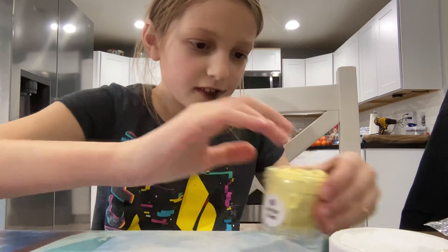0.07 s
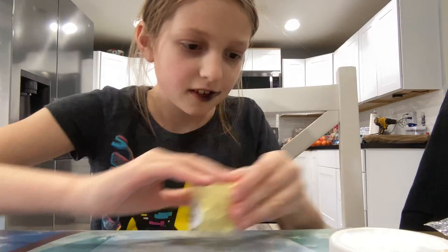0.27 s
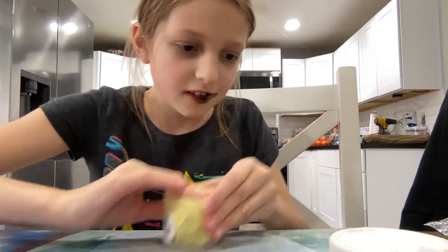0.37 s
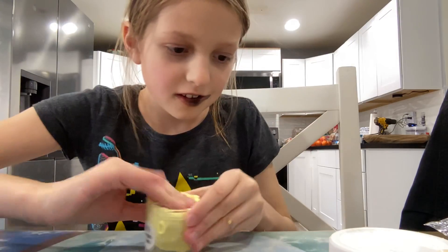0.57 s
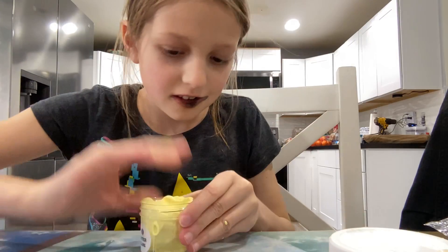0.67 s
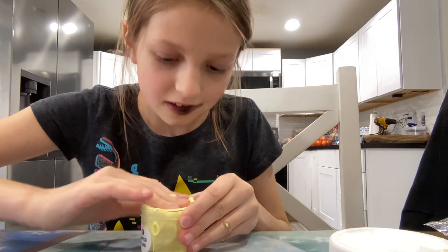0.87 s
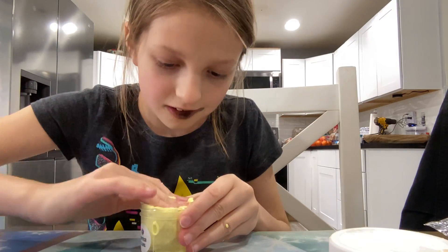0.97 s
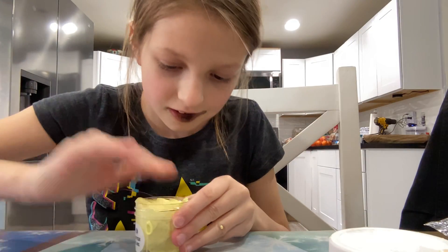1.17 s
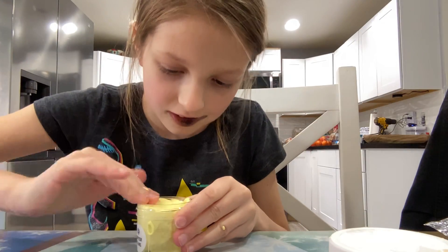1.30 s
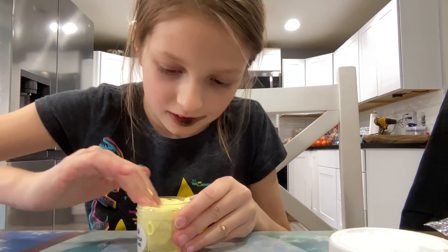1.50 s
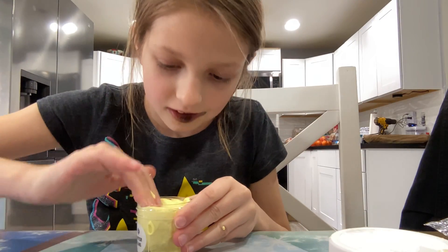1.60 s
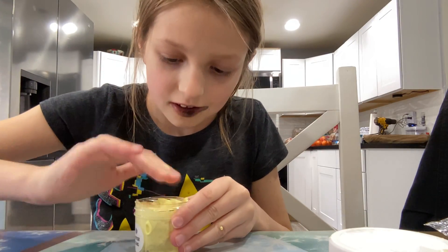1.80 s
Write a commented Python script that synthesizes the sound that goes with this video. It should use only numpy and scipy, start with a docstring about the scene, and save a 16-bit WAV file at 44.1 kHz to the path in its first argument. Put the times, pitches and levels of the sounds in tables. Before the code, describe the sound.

Sticky slime being pressed into a small plastic jar: sharp snaps, then the jar knocks down on a table with a thud and lid ticks, followed by softer wet rubbing and pushes, close microphone in a kitchen.

```python
"""Fingers press soft slime into a small plastic jar on a kitchen table, close to a phone, over steady room hum.
First faint sticky snaps and wet rubbing; louder snaps from 0.24 s; at 0.42 s the jar is set down,
the table top thuds, hands shift and a loose hard lid ticks. Then rubbing swells and fades between softer
snaps and pushes; the lid ticks twice more near 1.4 s; a last snap and a dull thud close.
Blows ring decaying modes; snaps are noise bursts with pocket notes; rubbing, hands and hum are shaped noise."""
import sys
import numpy as np
from scipy import signal
from scipy.fft import rfft, irfft
from scipy.io import wavfile
from scipy.ndimage import uniform_filter1d

SR = 44100
rng = np.random.default_rng(int(sys.argv[2]) if len(sys.argv) > 2 else 0)


def how_loud(loudness_db):
    """Turn decibels into a plain amplitude multiplier (0 dB gives 1, 20 dB gives 10)."""
    steps = np.asarray(loudness_db, float) / 20
    return 10 ** steps


def store_pcm(level_fs):
    """Save levels as 16-bit WAV."""
    pcm = np.round(np.clip(level_fs, -1, 1) * 32767).astype(np.int16)
    wavfile.write(sys.argv[1], SR, np.atleast_2d(pcm).T)


N = 81585  # samples


def colour(x, points):
    """Minimum-phase filter, via the cepstrum, with the given (Hz, dB) response."""
    point_hz, point_db = np.array(points, float).T
    hz = np.maximum(np.arange(2049) * SR / 4096, 1)
    log_gain = np.interp(np.log(hz), np.log(point_hz), point_db) * np.log(10) / 20
    cepstrum = irfft(log_gain)
    cepstrum[1:2048] *= 2  # fold onto positive time: causal
    cepstrum[2049:] = 0
    response = irfft(np.exp(rfft(cepstrum)))
    return signal.fftconvolve(x, response)[:len(x)]


def unit(x):
    """Scale to rms 1."""
    return x / np.sqrt(np.mean(x ** 2))


def decay(t, t60_s):
    """Exponential fall of 60 dB in t60_s."""
    return np.exp(-np.log(1000) * t / t60_s)


def seconds(length_s):
    """Time axis in seconds."""
    return np.arange(int(length_s * SR)) / SR


def ring(modes, scatter_db, length_s, sag=0):
    """Decaying modes of one blow, a row each, starting sharp by the fraction sag; and their time axis."""
    sag_s = 0.0097
    t = seconds(length_s)
    m = np.array(modes, float)
    hz, db, t60_s = m[:, :1], m[:, 1:2], m[:, 2:]
    gain = how_loud(db + scatter_db * rng.standard_normal((len(m), 1)))
    bent_t = t + sag * sag_s * (1 - np.exp(-t / sag_s))
    return gain * decay(t, t60_s) * np.sin(2 * np.pi * hz * bent_t), t


def add(out, x, at_s, peak_db):
    """Mix x in at a time with a peak level."""
    i = int(at_s * SR)
    out[i:i + len(x)] += (x * how_loud(peak_db) / np.abs(x).max())[:len(out) - i]


def walk(rate_hz):
    """Slow random wander, rms 1."""
    k = int(SR / rate_hz)
    steps = np.repeat(rng.standard_normal(N // k + 1), k)
    return unit(uniform_filter1d(uniform_filter1d(steps, k), k)[:N])


def follow(points):
    """Level in dB at every sample, straight lines between (s, dB) points."""
    at_s, db = np.array(points, float).T
    return np.interp(np.arange(N) / SR, at_s, db)


# Sticky snaps. Each row: start in seconds, peak in dB, pocket note in Hz, note over burst in dB, t60 in seconds.
SNAPS = [(0.0112, -51, 5660, 14, 0.09), (0.0303, -52.5, 11300, 0, 0.048),
         (0.2364, -24.5, 509, -16.5, 0.048), (0.3318, -30, 9680, 14.5, 0.0053),
         (0.3818, -26.5, 1330, -5, 0.011), (0.4064, -28, 4500, -10, 0.09), (0.4376, -25, 4920, 11.5, 0.015),
         (0.616, -38, 9100, -2, 0.018), (0.6418, -43, 9100, -17, 0.019), (0.6605, -39.5, 2550, 2.5, 0.023),
         (0.8374, -55, 944, 2, 0.11), (0.9408, -30, 650, -15.5, 0.013), (1.085, -44, 10500, 15, 0.011),
         (1.28, -61, 807, 6, 0.096), (1.5485, -51, 5100, -11.5, 0.022), (1.688, -54, 10500, 16, 0.022),
         (1.733, -56.5, 1070, -6, 0.052)]
# Burst spectrum, also of the lid's crack. Each row: frequency in Hz, relative density in dB.
CRACK_COLOUR = [(300, -28), (2000, -29), (4500, -23), (8000, -12), (10800, -9), (12500, -21.5),
                (16000, -47)]


def snaps():
    """Sticky skin lets go: a sharp crackling burst and the note of the pocket it opens."""
    rise_s, overtone_ratio, overtone_db, crackle_db = 0.0005, 2.64, -3.5, 2
    out, t = np.zeros(N), seconds(0.1)
    for at_s, peak_db, hz, pocket_db, t60_s in SNAPS:
        burst_noise, pocket_noise, crackle_noise = rng.standard_normal((3, len(t)))
        crackle = how_loud(crackle_db * unit(uniform_filter1d(crackle_noise, size=20)))
        env = decay(t, t60_s) * (1 - np.exp(-t / rise_s)) * crackle
        notes = []
        for f in (hz, hz * overtone_ratio):
            b, a = signal.iirpeak(min(f, 0.45 * SR), 2 + min(f, SR / 4) / 4000, SR)
            notes.append(unit(signal.lfilter(b, a, signal.lfilter(b, a, pocket_noise * env))))
        low, high = notes
        has_overtone = hz * overtone_ratio < SR / 4
        pocket = low + how_loud(overtone_db) * high * has_overtone
        burst = unit(colour(burst_noise * env, CRACK_COLOUR))
        add(out, burst + how_loud(pocket_db) * unit(pocket), at_s, peak_db)
    return out


# Hollow jar modes. Each row: frequency in Hz, relative level in dB, t60 in seconds.
JAR_MODES = [(297.5, -10, 0.087), (426, -14, 0.067), (676, -1, 0.045), (820, -5, 0.018), (1147, -6, 0.018),
             (1428, -7.5, 0.043), (1710, -1.5, 0.021), (2000, -5, 0.0079)]


def jar():
    """The jar touches, lands on its edge, then flat, with chatter between, ringing its hollow modes."""
    set_s, peak_db, landing_s = 0.4196, -14.5, 0.004
    out = np.zeros(N)
    modes, _ = ring(JAR_MODES, 0, 0.2)
    hits = 0.085 * rng.standard_normal(int(landing_s * SR))  # chatter
    hits[[0, len(hits) // 3, -1]] = 0.3, -0.9, -0.7  # touch, edge, flat
    add(out, np.convolve(modes.sum(0), hits), set_s, peak_db)
    return out


# Loose lid ticks. Each row: start in seconds, peak in dB, table echo included.
LID_TICKS = [(0.4382, -20), (0.4482, -21), (0.4608, -21.5), (0.5593, -19), (1.3333, -22.5), (1.425, -23)]
# Lid modes. Each row: frequency in Hz, relative level in dB before scatter, free t60 in seconds.
LID_MODES = [(791, -15, 0.069), (913, -12, 0.035), (1105, -9.5, 0.041), (2120, -17, 0.048),
             (3077, -12, 0.036), (5275, -6.5, 0.027), (6800, -12, 0.088), (7636, -10.5, 0.032),
             (8724, -10.5, 0.036), (10500, 2.5, 0.02), (11066, 3.5, 0.024), (13530, -13.5, 0.032),
             (4500, -17.5, 0.028)]


def lid():
    """Hard ticks: a crack and the lid's unsteady ring, mostly damped by contact within milliseconds."""
    rise_s, crack_db, held_s, free_share = 0.0006, -14, 0.0012, 0.14
    wobble_s, echo_s, echo_db = 0.004, 0.001, -7
    out = np.zeros(N)
    for at_s, peak_db in LID_TICKS:
        modes, t = ring(LID_MODES, 0.97, 0.15)
        held = np.exp(-t / held_s)
        drift = uniform_filter1d(rng.standard_normal(modes.shape), size=int(wobble_s * SR), mode="wrap")
        wobble = 1 + np.minimum(t / wobble_s, 1) * unit(drift) / 2
        tone = (modes * wobble).sum(0) * (free_share + held)
        crack = colour(rng.standard_normal(len(t)), CRACK_COLOUR) * held
        tick = tone / np.abs(tone).max() + how_loud(crack_db) * crack / np.abs(crack).max()
        tick = tick * (1 - np.exp(-(t / rise_s) ** 2))
        table_echo = how_loud(echo_db) * np.roll(tick, int(echo_s * SR))
        add(out, tick + table_echo, at_s, peak_db)
    return out


# Table thuds. Each row: start in seconds, peak in dB, tilt in dB per octave, t60 of the hand's damping in seconds.
THUDS = [(0.429, -25, -4, 0.26), (0.453, -32.5, -1.5, .2), (0.478, -30.5, -15, .4),
         (0.515, -39.5, -11.5, 1), (0.6, -44, 3.5, 0.72), (.655, -46, 4, .8), (0.843, -39, 0, .4),
         (.888, -42, -4, 0.49), (0.938, -51, -3, 0.58), (1.131, -47.5, 5.5, 0.57), (1.155, -46.5, -3, .4),
         (1.211, -55, -9, .5), (1.286, -35, -1.5, .13), (1.335, -44, -25, 0.13), (1.505, -52, 11.5, 0.92),
         (1.75, -48.5, 1.5, .5)]
# Table modes. Each row: frequency in Hz, relative level in dB before tilt and scatter, undamped t60 in seconds.
TABLE_MODES = [(95.8, 10.5, 0.14), (125.1, 8.5, 0.13), (171, -6.5, 0.1), (262.5, 0, 0.1), (306, -9, 0.2),
               (425, -9, 0.082)]


def table():
    """Soft pushes thud in the table top; high modes speak first, lows build up later, all sinking in pitch."""
    rise_cycles, sag = 0.68, 0.15
    out, hz = np.zeros(N), np.array(TABLE_MODES)[:, :1]
    for at_s, peak_db, tilt_db, t60_s in THUDS:
        modes, t = ring(TABLE_MODES, 3.5, 0.35, sag)
        tilt = how_loud(tilt_db * np.log2(hz / hz[0]))
        rise = 1 - np.exp(-(t * hz / rise_cycles) ** 2)
        add(out, (modes * decay(t, t60_s) * tilt * rise).sum(0), at_s, peak_db)
    return out


# Hands shifting. Each row: time in seconds, rms of the band noise in dB before wander.
HANDS_DB = [(0, -87), (0.377, -75), (0.446, -39), (0.559, -58.5), (0.666, -59.5), (0.777, -81),
            (0.898, -72), (1.04, -76.5), (1.134, -59.5), (1.201, -80), (1.551, -72.5), (1.85, -79)]
# Band edges of the shifting noise in Hz.
HANDS_BAND_HZ = [186.7, 780]
# Resonances of the jar's hollow in Hz.
JAR_AIR_HZ = (1130, 2057)


def hands():
    """Hands shift on jar and table: band noise, plus noise stirred in the hollow of the jar."""
    jar_air_db, wander_db = -10, 2
    band = signal.butter(2, HANDS_BAND_HZ, "band", fs=SR, output="sos")
    shift = unit(signal.sosfilt(band, rng.standard_normal(N)))
    for hz in JAR_AIR_HZ:
        b, a = signal.iirpeak(hz, 6, SR)
        shift = shift + how_loud(jar_air_db) * unit(signal.lfilter(b, a, rng.standard_normal(N)))
    return shift * how_loud(follow(HANDS_DB) + wander_db * walk(30))


# Wet rubbing. Each row: time in seconds, rms in dB before wander.
RUB_DB = [(0, -60.5), (0.058, -73.5), (.1, -91), (0.227, -80), (.25, -60), (0.368, -71.5), (0.426, -59.5),
          (0.672, -58), (0.719, -86.5), (0.922, -82), (0.962, -63), (1.053, -80.5), (1.138, -54),
          (1.186, -85), (1.63, -82.5), (1.645, -79.5), (1.734, -73), (1.775, -84.5)]
# Rubbing spectrum. Each row: frequency in Hz, relative density in dB.
RUB_COLOUR = [(500, -22), (1000, -9.5), (1830, -8.5), (3400, -16.5), (7000, -9.5), (10500, -0.5),
              (12500, -12), (16000, -36.5)]


def rubbing():
    """Wet hiss with tiny bubbles that pop, each on its own pitch."""
    pops_per_s, pop_cycles, wander_db = 600, 7, 2
    fizz, t = np.zeros(N), seconds(0.015)
    for at, high, size in rng.random((int(pops_per_s * N / SR), 3)):
        hz = 3000 * 4 ** high
        pop = np.sin(2 * np.pi * hz * t) * t * np.exp(-t * hz / pop_cycles * 2)
        add(fizz, pop, at * N / SR, -4 * np.log(size) + 3 * high)  # few loud, many soft
    hiss = unit(colour(rng.standard_normal(N) + unit(fizz), RUB_COLOUR))
    return hiss * how_loud(follow(RUB_DB) + wander_db * walk(60))


# Hum spectrum. Each row: frequency in Hz, relative density in dB.
HUM_COLOUR = [(30, -27.5), (98, -4.5), (584, -15), (649, -13), (822, -36.5), (1910, -40), (2410, -37),
              (16000, -47)]


def hum():
    """Steady room noise."""
    rms_db, settle = -68, 4096  # settle: samples dropped while the filter fills
    return unit(colour(rng.standard_normal(N + settle), HUM_COLOUR)[settle:]) * how_loud(rms_db)


def kitchen_echo(air):
    """Short diffuse room echo: decaying noise of unit energy."""
    t60_s, level_db, rise_s = 0.16, -8.5, 0.00053
    t = seconds(0.5)
    tail = rng.standard_normal(len(t)) * decay(t, t60_s) * np.clip(t / rise_s, 0, 1)
    return how_loud(level_db) * signal.fftconvolve(air, tail / np.sqrt(np.sum(tail ** 2)))[:N]


def scene():
    """All sources, with the kitchen echo on the airborne ones."""
    air = snaps() + jar() + lid() + rubbing()
    return (air + kitchen_echo(air) + table() + hands() + hum())[None]


def band_limit(x):
    """A steep low-pass at the top of the band."""
    return signal.sosfilt(signal.butter(12, 16530, fs=SR, output="sos"), x)


def record(dry):
    """The phone cuts the deepest bass."""
    high_pass = signal.butter(N=5, Wn=58, btype="high", fs=SR, output="sos")
    mix = signal.sosfilt(high_pass, dry)
    return band_limit(mix)


dry = scene()
out = record(dry)
store_pcm(out)
```